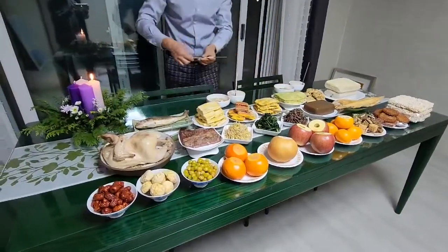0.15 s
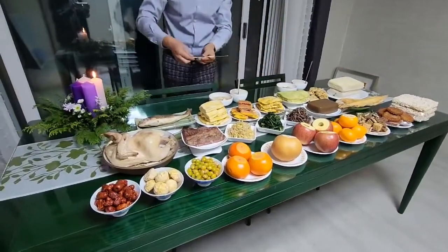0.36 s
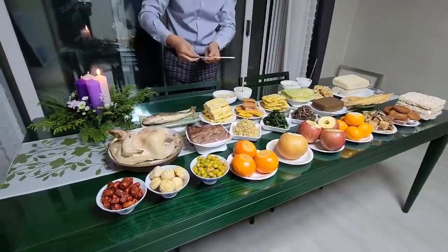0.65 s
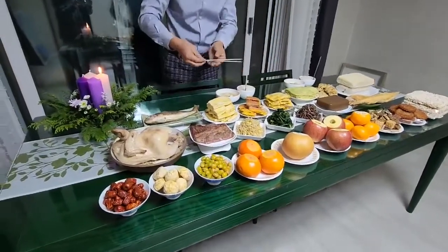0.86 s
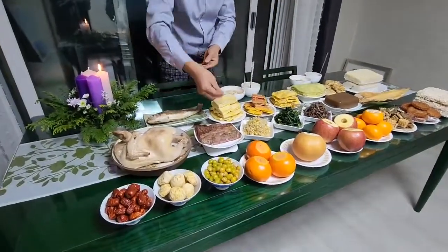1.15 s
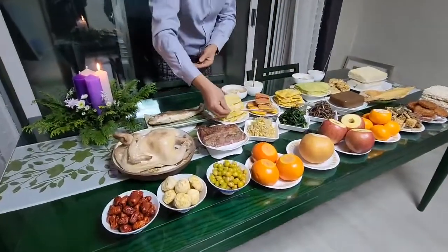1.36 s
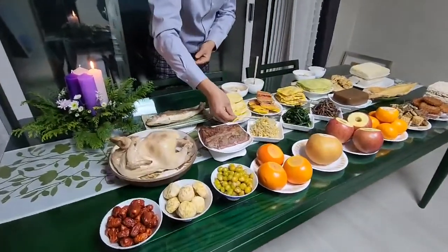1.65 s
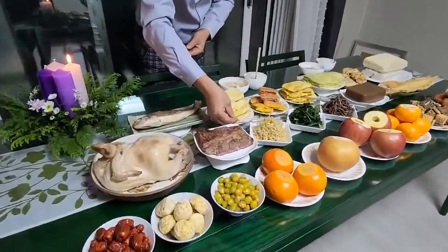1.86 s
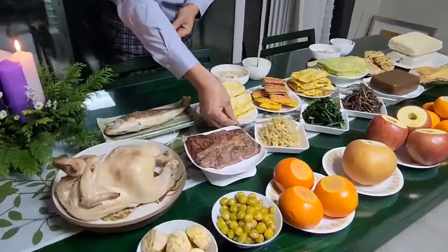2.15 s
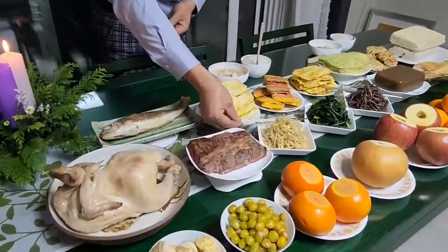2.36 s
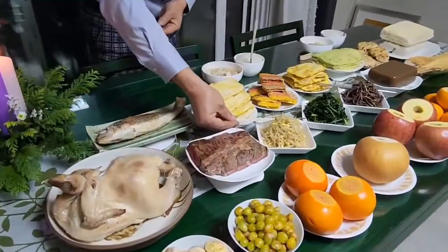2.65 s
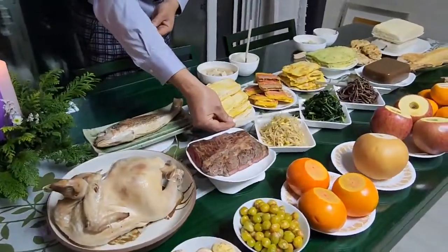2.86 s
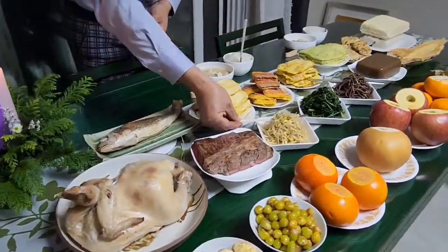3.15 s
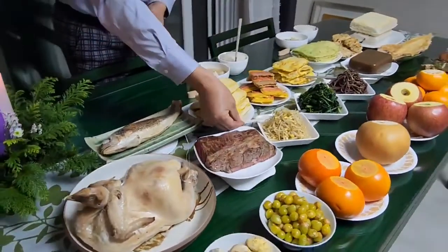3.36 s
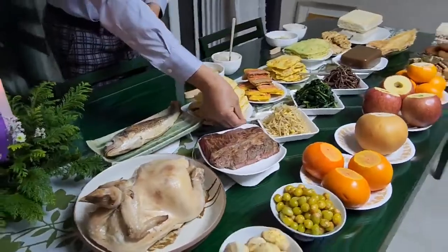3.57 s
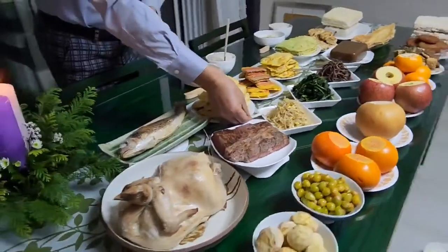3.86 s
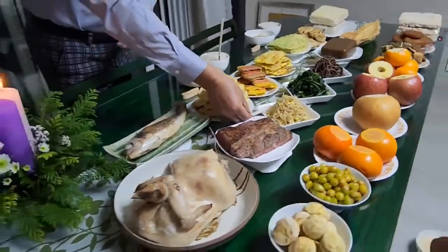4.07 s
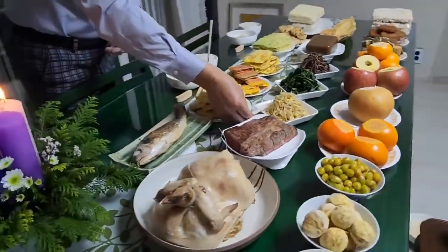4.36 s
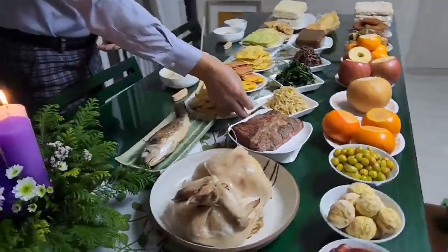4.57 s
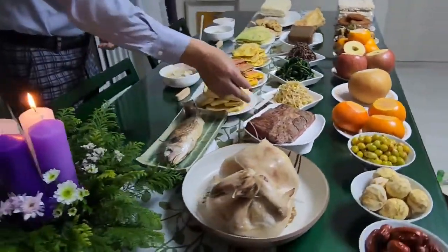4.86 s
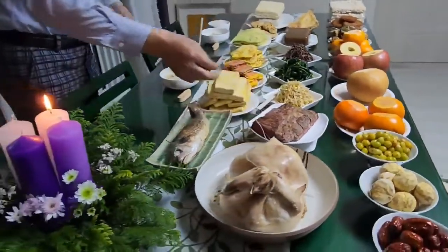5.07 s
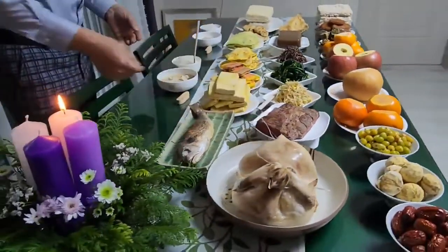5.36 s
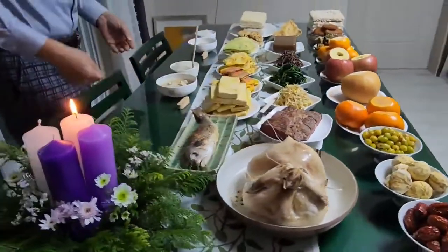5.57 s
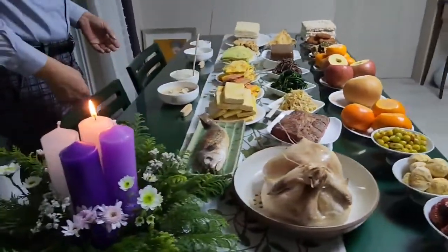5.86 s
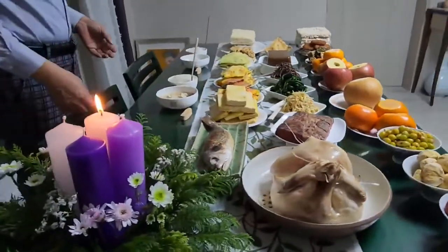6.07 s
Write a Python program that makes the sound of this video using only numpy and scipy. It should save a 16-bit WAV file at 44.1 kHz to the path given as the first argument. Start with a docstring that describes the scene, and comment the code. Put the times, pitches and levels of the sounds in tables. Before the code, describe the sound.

Close hand-held stereo pickup in a bare room with short reverberation. Over a faint motor hum, fan rush and low rumble, sleeves brush and chopsticks tick lightly, then strike a plate in a sharp double clack with a thin ceramic ring. Soft knocks and a brief chattering clatter follow, then dry grip ticks, small bumps and fabric swishes as the hand withdraws.

```python
"""Chopsticks are tapped together and laid on china plates on a laid table, a step or two from a hand-held phone.
Each blow drives decaying partials of sticks, plate and dish, plus a filtered table knock; a bare dining room
draws it out. Shirt sleeves swish as shaped noise, the hand on the phone ticks and bumps as short gritty pips,
and an appliance hums as wavering sines over a fan's rush, low rumble and still air."""
import sys
import numpy as np
from scipy import signal
from scipy.fft import rfft, irfft, next_fast_len
from scipy.io import wavfile

SR = 44100
rng = np.random.default_rng(int(sys.argv[2]) if len(sys.argv) > 2 else 0)


def inscribe(sig):
    """Save sig as 16-bit PCM at rate SR to the path in sys.argv[1].

    A 1-D sig is mono; a 2-D sig holds one channel per row.
    Samples are clipped to [-1, 1] before scaling.
    """
    pcm = np.round(np.clip(np.atleast_2d(sig).T, -1, 1) * 32767)
    wavfile.write(sys.argv[1], SR, pcm.astype(np.int16))


N = 274743
RING = 24000  # samples in one blow's echo


def undb(db):
    """Decibels to amplitude gain."""
    return 10 ** (np.asarray(db) / 20)


def along(points, hz):
    """Read (Hz, value) points on a log-frequency axis."""
    point_hz, value = np.transpose(points)
    return np.interp(np.log(np.maximum(hz, 1)), np.log(point_hz), value)


def colour(x, points):
    """Minimum-phase filter through (Hz, dB) points: the log spectrum's cepstrum is folded to be causal."""
    size = 2 * next_fast_len(x.shape[-1])
    gain = undb(along(points, np.fft.rfftfreq(size, 1 / SR)))
    cepstrum = irfft(np.log(gain))
    cepstrum[1:size // 2] *= 2
    cepstrum[size // 2 + 1:] = 0
    response = np.exp(rfft(cepstrum))
    return irfft(rfft(x, size) * response)[..., :x.shape[-1]]


def band(x, lo_hz, hi_hz, order=2):
    """Butterworth band-pass."""
    edges_hz = [lo_hz, min(hi_hz, SR / 2 - 100)]
    return signal.sosfilt(signal.butter(order, edges_hz, "band", fs=SR, output="sos"), x)


def level(x, db, count=None):
    """Scale x so that its first count samples have the given rms."""
    return x * undb(db) / np.sqrt(np.mean(x[..., :count] ** 2))


def add(out, start_s, x):
    """Mix x into out at start_s."""
    i = int(start_s * SR)
    out[:, i:i + x.shape[-1]] += x[..., :max(N - i, 0)]


def stereo_noise(count, alike_hz=850):
    """Diffuse noise at two close ports: alike in the bass, unrelated in the treble."""
    mid, side = rfft(rng.standard_normal((2, count)))
    alike = .92 / (1 + (np.fft.rfftfreq(count, 1 / SR) / alike_hz) ** 2)
    sign = np.array([[1], [-1]])
    ports = mid * np.sqrt(1 + alike) + side * np.sqrt(1 - alike) * sign
    return irfft(ports, count) / np.sqrt(2)


# motor hum partials: pitch_hz [Hz], level_db [dB rms before swell and waver]
HUM_PARTIALS = [(59.2, -63), (118.4, -84.5)]
# spectrum of the still air: freq_hz [Hz], density_db [relative dB per Hz]
AIR_SPECTRUM = [(13, -66), (22, -26), (41, -15.5), (64, -32), (102, -13.5), (187, -11.5), (260, -14.5),
                (352, -10), (516, -21), (608, -18.5), (717, -22.5), (2210, -25), (3160, -35), (3820, -30),
                (15500, -41)]
AIR_DB = -65.5
APPROACH_S = (.7, 4.4)  # the phone is carried up to the table between these times
HUM_FAR_DB, HUM_NEAR_DB = -1.8, 2  # the hum grows on the way


def appliance(waver_db=-2.5, fan_db=-74, rumble_db=-68, port_phase_rad=0.25):
    """Motor sines whose level wavers, a fan's low rush, rumble and the still air of the room."""
    t = np.arange(N) / SR
    waver = np.interp(t, np.linspace(0, t[-1], 40), rng.standard_normal(40))
    swell_db = np.interp(t, APPROACH_S, [HUM_FAR_DB, HUM_NEAR_DB])
    phase_rad = np.array([[port_phase_rad], [0]])
    hum = sum(level(np.sin(2 * np.pi * pitch_hz * t + phase_rad), level_db)
              for pitch_hz, level_db in HUM_PARTIALS)
    fan = level(band(stereo_noise(N), 327, 355), fan_db)
    rumble = level(band(stereo_noise(N), 32, 74), rumble_db)
    air = level(colour(stereo_noise(N), AIR_SPECTRUM), AIR_DB)
    return hum * undb(swell_db + waver_db * waver) + fan + rumble + air


# cloth spectrum before tilt: freq_hz [Hz], density_db [relative dB per Hz]
CLOTH_SPECTRUM = [(300, -23), (600, 1.5), (1000, 0.5), (2000, 3), (3500, -0.5), (6000, -4.5), (10000, -8),
                  (14000, -12), (15500, -19)]


def cloth(count, tilt_db_per_octave, grain_db=2.0, uneven_db=1.23):
    """Threads slip over each other in countless tiny catches: noise with fast and slow random gain."""
    def wander(points):
        return np.interp(np.linspace(0, points - 1, count), np.arange(points), rng.standard_normal(points))

    gain_db = grain_db * wander(3000) + uneven_db * wander(100)
    catches = stereo_noise(count) * undb(gain_db)
    tilted = [(freq_hz, density_db + tilt_db_per_octave * np.log2(freq_hz))
              for freq_hz, density_db in CLOTH_SPECTRUM]
    return colour(catches, tilted)


SWISH_TILT_DB_PER_OCTAVE, SWISH_REF_DB = 1.5, -55  # tilt at the reference level
TILT_PER_DB = 0.3  # dB per octave, per dB: a brisker move is louder and brighter
# arm moves: middle_s [s], half_s [s, Gaussian sigma], level_db [dB rms before the swell envelope]
ARM_MOVES = [(0.08, 0.086, -65.5), (0.348, 0.071, -60.5), (0.974, 0.058, -65.5), (1.276, 0.18, -65),
             (1.588, 0.044, -49.5), (3.199, 0.073, -60.5), (3.631, .032, -57.5), (3.719, 0.13, -63.5),
             (3.988, 0.084, -59.5), (4.409, 0.026, -56), (4.576, 0.046, -57.5), (4.929, .054, -49.5),
             (5.384, 0.025, -54.5), (5.61, 0.21, -60), (5.778, 0.031, -59.5), (6.145, 0.044, -48)]


def sleeves():
    """Cloth noise swells and fades with each arm move; louder ones are brighter."""
    out = np.zeros((2, N))
    t = (np.arange(2 * RING) - RING) / SR
    for middle_s, half_s, level_db in ARM_MOVES:
        tilt = SWISH_TILT_DB_PER_OCTAVE + TILT_PER_DB * (level_db - SWISH_REF_DB)
        swish = level(cloth(len(t), tilt), level_db) * np.exp(-(t / half_s) ** 2 / 2)
        add(out, max(middle_s + t[0], 0), swish[:, middle_s + t >= 0])
    return out


def pip(hz, length_s, grit_db):
    """A sine that swells and dies at once, its envelope peaking at length_s, roughened by grit; peak near 1."""
    t = np.arange(RING // 4) / SR
    grit = level(band(rng.standard_normal(len(t)), hz / 3, hz * 2), grit_db) / 2
    envelope = t / length_s * np.exp(1 - t / length_s)
    return envelope * (np.sin(2 * np.pi * hz * t) + grit) / np.hypot(1, undb(grit_db))


TICK_S, CASE_HZ = 0.00057, 1600  # a tick near the case's own pitch rings clean; higher ones are gritty
TICK_GRIT_DB, GRIT_DB_PER_OCTAVE = -18, 16.5
BUMP_CYCLES = 0.47  # a bump's envelope peaks after this many of its own cycles
# dry ticks of the grip on the phone: start_s [s], peak_db [approximate dB], pitch_hz [Hz]
GRIP_TICKS = [(1.253, -50.5, 13200), (1.3744, -39.5, 1620), (1.6607, -44.5, 1310), (1.784, -41, 1660),
              (4.566, -31, 9350), (4.6434, -34, 4430), (5.0661, -45.5, 7040), (5.312, -45.5, 1620),
              (5.6463, -40, 1570)]
# soft bumps of the hand and feet: start_s [s], peak_db [approximate dB], pitch_hz [Hz]
SOFT_BUMPS = [(0.386, -42.5, 340), (0.392, -44, 47.7), (0.628, -53, 71), (0.865, -50.5, 75),
              (.93, -45.5, 51.7), (3.744, -42.5, 65), (5.362, -47, 114), (5.391, -40, 82)]


def handling(bump_grit_db=-3):
    """Ticks and bumps reach both ports alike through the phone's case, without any room."""
    out = np.zeros((2, N))
    for start_s, peak_db, pitch_hz in GRIP_TICKS:
        grit_db = TICK_GRIT_DB + GRIT_DB_PER_OCTAVE * np.log2(pitch_hz / CASE_HZ)
        add(out, start_s, undb(peak_db) * pip(pitch_hz, TICK_S, grit_db))
    for start_s, peak_db, pitch_hz in SOFT_BUMPS:
        add(out, start_s, undb(peak_db) * pip(pitch_hz, BUMP_CYCLES / pitch_hz, bump_grit_db))
    return out


def contact(chatter_s, bounce=0.47, count=9):
    """A first blow, then rebounds that die away; a longer chatter holds more of the energy."""
    when, size = rng.random((2, count))
    when = (np.arange(count) + when) / count
    chatter_s = np.clip(chatter_s, 0, .2)
    force = np.zeros(RING)
    force[0] = 1
    rebounds = bounce * np.sqrt(chatter_s / 0.011) * (.5 + size) * (1 - when)
    force[1 + (when * chatter_s * SR).astype(int)] += rebounds
    return force


# reverberation time of the room: freq_hz [Hz], t60_s [s]
ROOM_DECAY = [(120, 0.48), (700, 0.47), (1900, 0.4), (4800, 0.25), (9000, 0.25), (15000, 0.2)]


def room(direct_db, build_s=0.00033, near_s=0.0019, near_db=-4):
    """Paths from the table: the straight one, glances off the dishes, then echoes whose treble fades first."""
    t, hz = np.arange(RING) / SR, np.fft.rfftfreq(RING, 1 / SR)
    noise = rfft(stereo_noise(RING))
    octave = np.round(np.log2(np.clip(hz, 125, None)))
    tail = sum(irfft(noise * (octave == k)) * undb(-60 * t / along(ROOM_DECAY, 2 ** k))
               for k in np.unique(octave))
    tail *= 1 - np.exp(-t / build_s)
    # the table top and the crowded dishes spread the first arrival over a few milliseconds
    near = stereo_noise(RING) * t * np.exp(-2 * t / near_s)
    near *= undb(near_db) / np.sqrt(np.sum(near ** 2) / 2)
    near[[0, 1], [2, 3]] += .5  # straight path, one sample later at the right port
    return level(tail, 0) + level(near, direct_db)


def through(x, paths):
    """Convolve a short sound with the paths to both ports."""
    return signal.fftconvolve(np.atleast_2d(x), paths, axes=1)[:, :RING]


def ring(blow, hz, db, t60_s, rise_s=0.00009):
    """Fading partials driven by a blow; each carries the energy that its level gives it."""
    t, size = np.arange(RING // 2) / SR, 3 * RING // 2
    decay = np.exp(-np.log(1000) * np.outer(1 / t60_s, t))
    partials = np.sin(2 * np.pi * np.outer(hz, t)) * decay * (1 - np.exp(-t / rise_s))
    partials, drive = rfft(partials, size), rfft(blow, size)
    energy = np.abs(drive) ** 2 @ np.abs(partials.T) ** 2
    return irfft(drive * ((undb(db) / np.sqrt(energy)) @ partials), size)[:, :RING]


# mean bending pitches of a pair of chopsticks: pitch_hz [Hz]
STICK_PITCHES = [1900, 2110, 2290, 3060, 3220, 4290, 4450, 5850, 6490, 7680, 8030, 8850, 9510, 10450, 11350,
                 11890, 12320, 14700, 15000]
# the same modes: level_db [relative dB before scatter], t60_s [s]
STICK_MODES = [(-4, 0.0023), (-0.5, 0.01), (-8, .012), (4, 0.046), (0.5, 0.03), (4, 0.014), (-25.5, 0.13),
               (-2.5, 0.054), (-8, 0.02), (-10, 0.053), (-9, 0.075), (-11, .018), (-5, 0.0096),
               (-20.5, 0.035), (-14, 0.031), (-6, 0.063), (-6, 0.029), (-48, 0.017), (-15, .03)]
# crack of the contact itself: freq_hz [Hz], density_db [relative dB per Hz]
CRACK_SPECTRUM = [(800, -3), (1800, -6.5), (2800, 1.5), (5000, -3), (6200, 4), (9000, 0.5), (12000, -3),
                  (15500, 0.5)]


def ring_sticks(blow, scatter_db=3, crack_db=-3):
    """Bending modes plus crack; grip and point of contact shift the modes a little from blow to blow."""
    mode_db, t60_s = np.transpose(STICK_MODES)
    louder, higher = rng.standard_normal((2, len(STICK_MODES)))
    hz = STICK_PITCHES * (1 + .007 * higher)
    modes = level(ring(blow, hz, mode_db + scatter_db * louder, t60_s), 0)
    return modes + level(colour(blow, CRACK_SPECTRUM), crack_db)


# partials of the china plate: pitch_hz [Hz]
PLATE_PITCHES = [3011, 3057, 4305, 4886, 5862, 6520, 8002, 8815, 9470, 11860, 12292, 13300, 14550, 14820]
# the same partials: level_db [relative dB], t60_s [s]
PLATE_MODES = [(-54, 0.75), (-27, 0.56), (7, 0.03), (-15, 0.31), (-13, 0.23), (-2.5, 0.16), (6.5, 0.051),
               (-10.5, 0.075), (0.5, 0.045), (-2, 0.1), (-2.5, 0.094), (-12, .05), (-21, .08), (-4, 0.074)]


def ring_plate(blow):
    """Partials of the china rim."""
    return ring(blow, PLATE_PITCHES, *np.transpose(PLATE_MODES))


DISH_RISE_CYCLES = 3.1  # rise time constant
# body modes of a laden dish and, lowest, of the table top under it: pitch_hz [Hz]
DISH_PITCHES = [138, 180, 690, 738, 825, 1135, 1209, 1296, 1428, 1465]
# the same modes: level_db [relative dB], t60_s [s]
DISH_MODES = [(-7.5, 0.39), (-3, 0.16), (-5.5, 0.24), (-15, 0.079), (0, 0.024), (2.5, 0.017), (0, 0.019),
              (2.5, 0.056), (-1.5, 0.25), (3, 0.23)]


def ring_dish(blow):
    """The heavy dish and table top take some cycles to get going, so the bass comes late."""
    rise_s = DISH_RISE_CYCLES / np.array(DISH_PITCHES)[:, None]
    return ring(blow, DISH_PITCHES, *np.transpose(DISH_MODES), rise_s=rise_s)


# dull knock of the dish on the table top: freq_hz [Hz], density_db [relative dB per Hz]
TABLE_SPECTRUM = [(60, -33.5), (110, -13), (165, 2), (250, -3.5), (350, 0.5), (480, 1), (720, 3.5),
                  (1000, -1), (1500, 1), (2300, -1.5), (3500, -9.5), (6000, -24.5), (15000, -65)]


def knock_table(blow):
    """A blow filtered to the table top's dull spectrum."""
    return colour(blow, TABLE_SPECTRUM)


# a fully hard blow rings the sticks this far above the blow's strength; a fully soft one loses this much of it
STICK_DB, STICK_SOFT_LOSS_DB = 8, 26
RING_LOSS_POWER = 3.83  # the ring holds up until the contact is very soft
TREBLE_DB, TREBLE_SOFT_LOSS_DB = 11, 51  # the same for the sticks' upper modes
PLATE_DB, DISH_DB = -1.5, 2  # rim (relative to the sticks) and body of the china
CHINA_SHIELD_DB = 10.5  # a blow wholly on china reaches the table this much weaker
DIRECT_DB = -5  # early paths over echoes
KNOCK_PAN_DB, STICK_PAN_DB, TREBLE_PAN_DB, PLATE_PAN_DB = 1.5, -.5, 0.5, -0.5  # left minus right
# chopstick blows: start_s [s], strength_db [dB], hardness [clipped to 0-1],
# china_db [dB, how squarely it lands on china], chatter_s [s]
BLOWS = [(1.7248, -58, 0.97, -6.5, 0.0054), (1.822, -66, 1, 0, 0.006), (1.842, -50.5, .98, -12, 0.0072),
         (1.851, -46.5, 0.97, -15, 0.0029), (1.9164, -48, 0.81, -23, .001), (1.964, -55, 0, -33, 0.00096),
         (2.127, -66.5, 0.38, -14, .012), (2.258, -62, 0.63, -11.5, 0.021),
         (2.557, -55.5, 0.19, -15.5, 0.026), (2.614, -54.5, 0.23, -15, 0.0057),
         (2.640, -56, 0.94, -5, 0.0051), (2.831, -66, .6, -11, 0.0067), (2.9702, -35, 0.84, 4, 0.0027),
         (2.986, -36, 0.95, -4.5, 0.037), (3.309, -58.5, 0.04, -19, 0.0094), (3.371, -59.5, 0, -10, 0.0011),
         (3.484, -43, 0.03, -21.5, 0.0066), (3.79, -53, 0.13, -6.5, 0.015),
         (3.8157, -47, 0.49, -10.5, .018), (3.885, -53.5, 0, -31, 0.01), (4.052, -40.5, 0.61, -6, .02),
         (4.063, -43.5, 0.87, -12, 0.03), (4.086, -50, 0.93, -15, .006), (4.415, -55, 0.27, -4, 0.045),
         (4.473, -52, 0.09, -6.5, 0.0038), (4.547, -49.5, 0.49, -4, 0.041)]


def chopsticks(split_hz=7000):
    """Every blow drives table, dish, sticks and plate; hardness and landing spot set their balance."""
    out = np.zeros((2, N))
    for start_s, strength_db, hardness, china_db, chatter_s in BLOWS:
        blow = through(contact(chatter_s), room(DIRECT_DB))
        stick = ring_sticks(blow)
        # a softer contact is longer: the treble goes first, then the ring, until only the knock is left
        soft = 1 - np.clip(hardness, 0, 1)
        stick_db = STICK_DB - STICK_SOFT_LOSS_DB * soft ** RING_LOSS_POWER
        treble_db = TREBLE_DB - TREBLE_SOFT_LOSS_DB * soft
        on_china = 1 / (1 + undb(-2 * china_db))  # share of the blow's energy that the dish takes
        parts = [(knock_table(blow), -CHINA_SHIELD_DB * on_china, KNOCK_PAN_DB),
                 (ring_dish(blow), DISH_DB + 10 * np.log10(on_china), KNOCK_PAN_DB),
                 (band(stick, 1130, split_hz, order=5), stick_db, STICK_PAN_DB),
                 (band(stick, split_hz, 16700, order=5), treble_db, TREBLE_PAN_DB),
                 (ring_plate(blow), PLATE_DB + stick_db + china_db, PLATE_PAN_DB)]
        for part, part_db, pan_db in parts:
            pan = undb(np.array([[pan_db], [-pan_db]]) / 2)
            add(out, start_s, level(part, strength_db + part_db, count=1323) * pan)  # rms over 30 ms
    return out


def scene():
    """The room and appliance, the person at the table, the phone and the chopsticks."""
    return appliance() + sleeves() + handling() + chopsticks()


TOP_HZ = 15600


def record(dry):
    """The phone cuts the top: a steep elliptic low-pass."""
    return signal.sosfilt(signal.ellip(10, .2, 80, TOP_HZ, fs=SR, output="sos"), dry)


dry = scene()
out = record(dry)
inscribe(out)
```